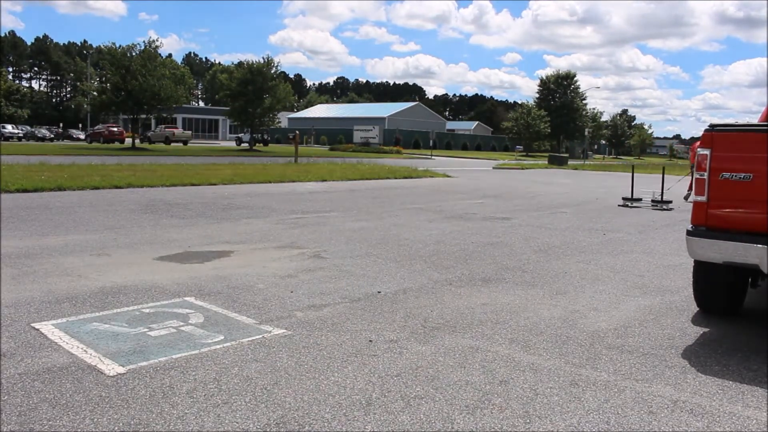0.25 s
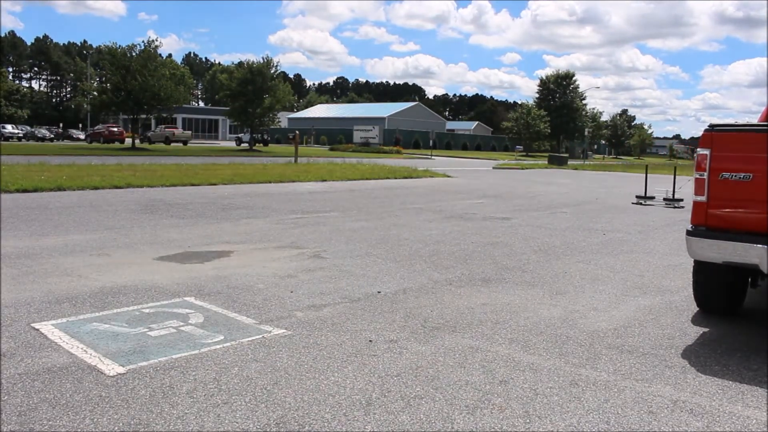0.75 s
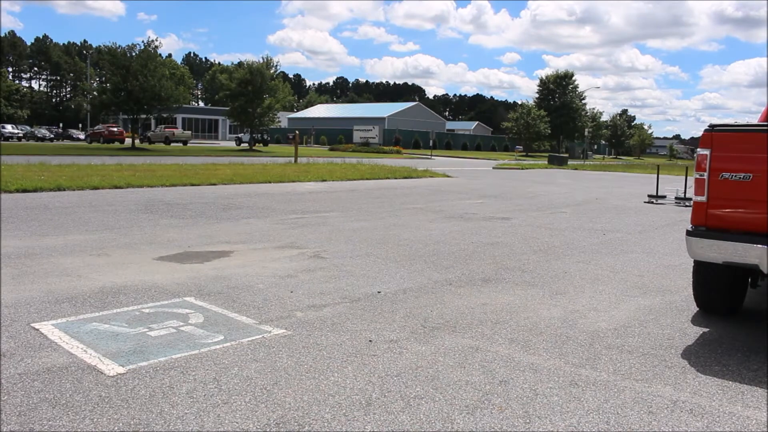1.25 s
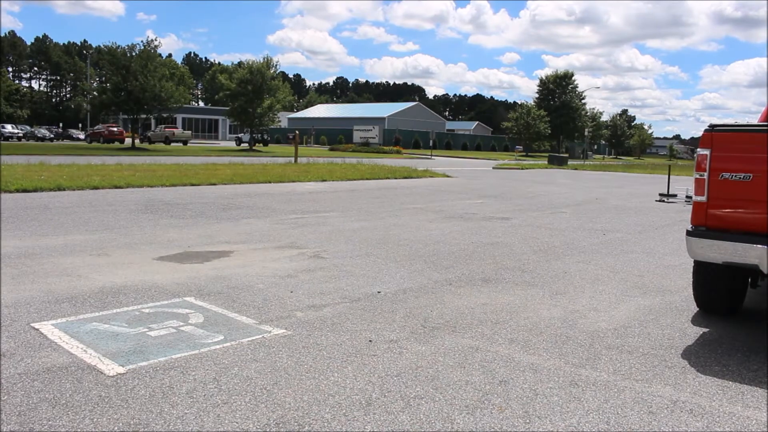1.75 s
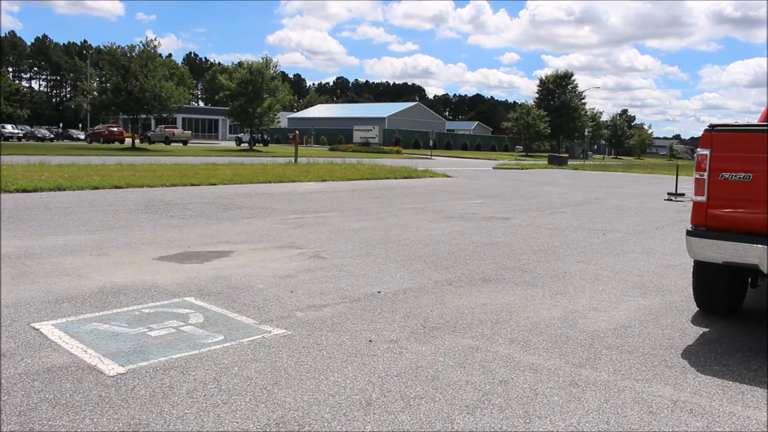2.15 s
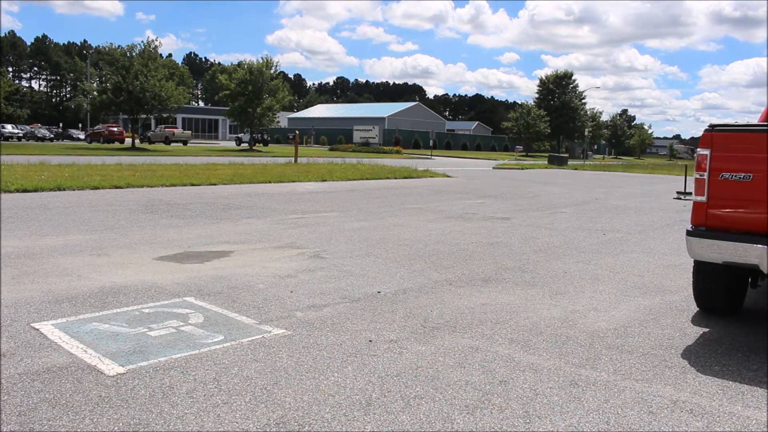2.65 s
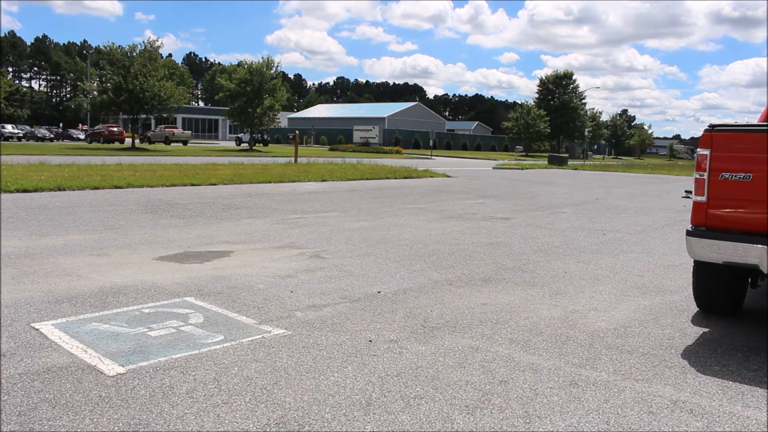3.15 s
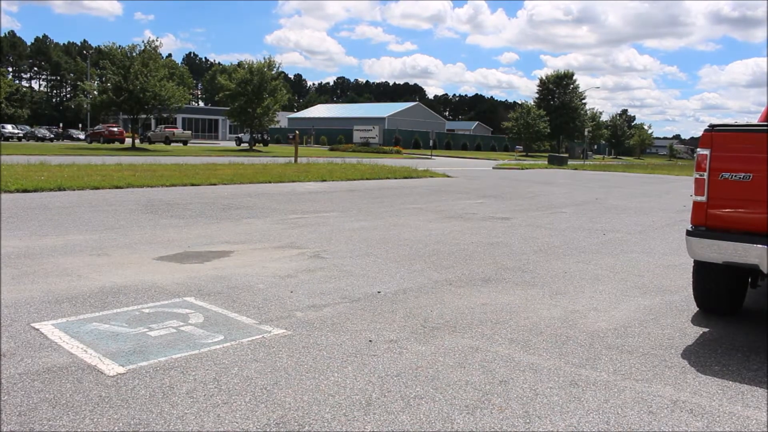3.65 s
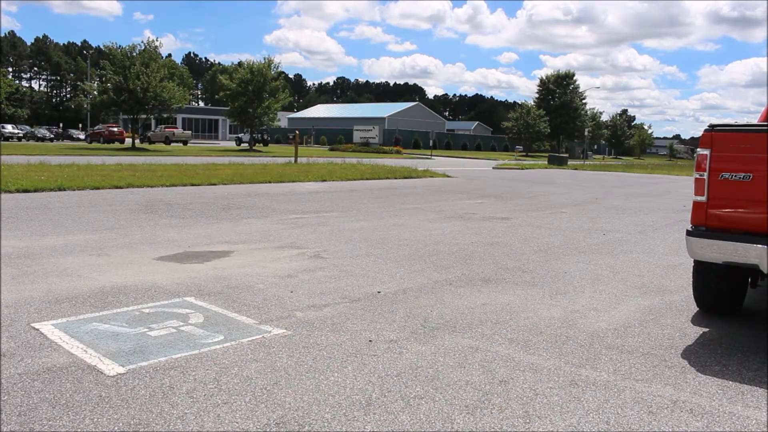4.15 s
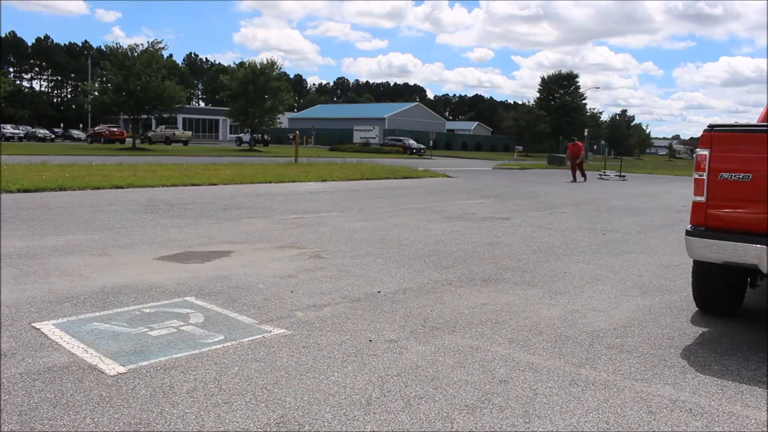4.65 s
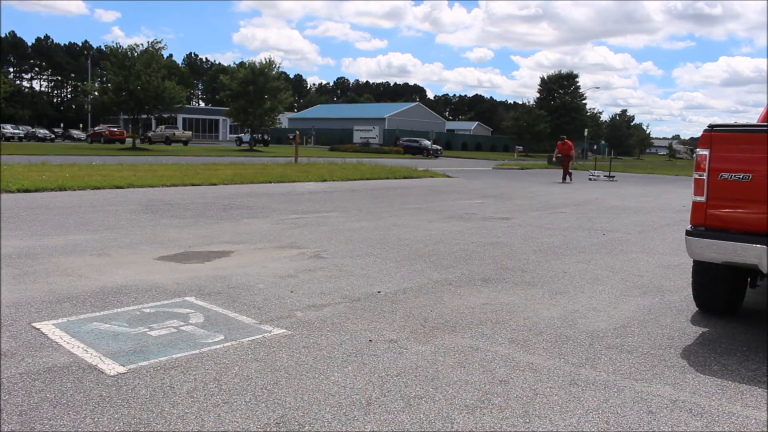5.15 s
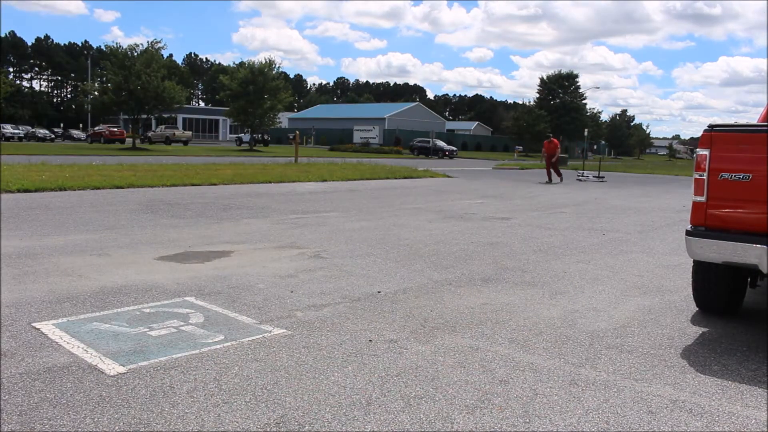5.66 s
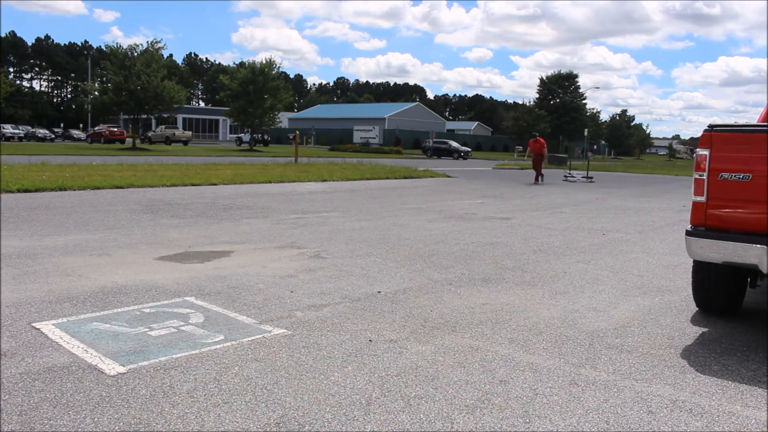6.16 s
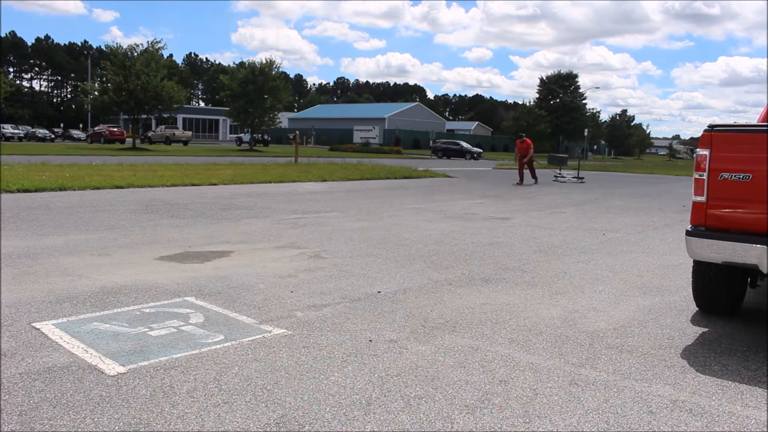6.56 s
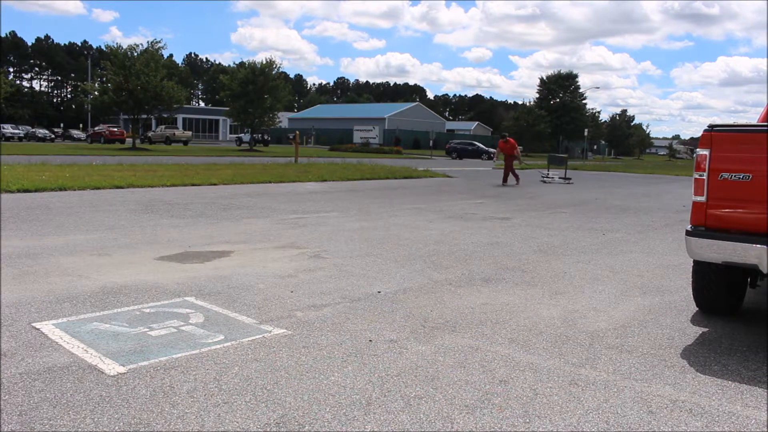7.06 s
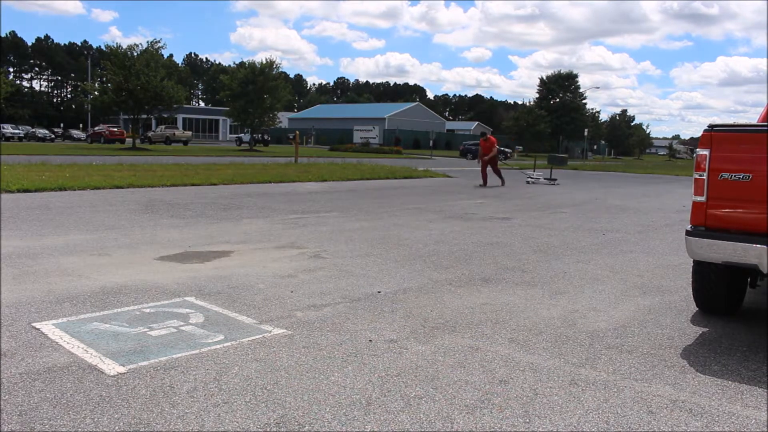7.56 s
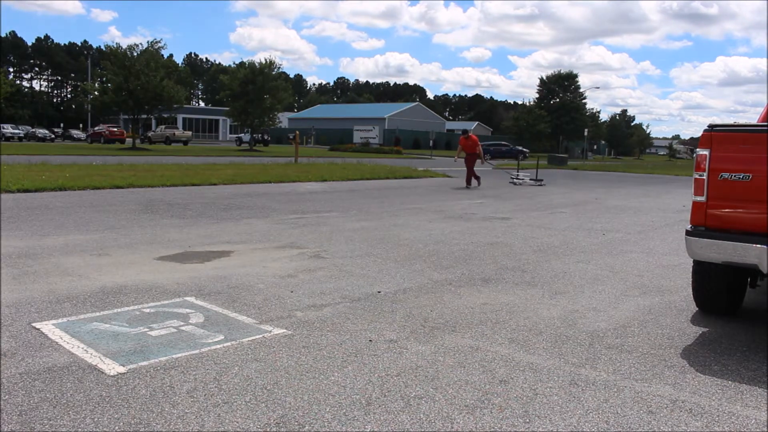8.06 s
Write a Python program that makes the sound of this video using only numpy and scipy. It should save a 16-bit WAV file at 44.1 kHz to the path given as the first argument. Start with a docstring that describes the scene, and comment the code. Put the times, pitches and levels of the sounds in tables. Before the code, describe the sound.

A weighted steel sled grinds over asphalt in bursts, plates clanking and chain clinking, while strong wind thumps the microphone early on.

```python
"""Weighted sled dragged over asphalt

A steel sled loaded with weight plates is dragged far off on a gusty day. Grit noise grinds under the runners
and shakes the resonant modes of the frame; blows make plates clank and the links of the tow chain clink.
Low noise buffets the microphone as wind, over a traffic murmur of coloured noise and a faint wavering sine hum.
A limiter holds the peaks."""
import sys
import numpy as np
from scipy import signal
from scipy.fft import rfft, irfft, next_fast_len
from scipy.io import wavfile
from scipy.ndimage import uniform_filter1d, minimum_filter1d, map_coordinates

SR = 44100
rng = np.random.default_rng(int(sys.argv[2]) if len(sys.argv) > 2 else 0)


def wav_out(sig):
    """Save sig, one row per channel (or a flat mono array), as 16-bit PCM at SR to the path in sys.argv[1]."""
    wavfile.write(sys.argv[1], SR, np.round(np.clip(np.atleast_2d(sig).T, -1, 1) * 32767).astype(np.int16))


N = 366912

# Levels in the tables are starting points: trims and random wavering are added where they are used.

# distant traffic and low scrape: start_s, level_db
TRAFFIC_LEVEL = [(0, -42), (.14, -47), (.5, -40), (.78, -44), (1.5, -37.5), (2.15, -48.5), (2.5, -38),
                 (2.85, -48), (3.0, -37.5), (3.37, -44), (3.87, -36), (4.44, -36), (5.15, -37.5),
                 (5.35, -33.5), (5.8, -37.5), (6.8, -39), (7.45, -40), (8.1, -35.5), (8.32, -36)]
# dull knocks of the runners, lifting the low murmur: peak_s, lift_db
RUNNER_KNOCKS = [(.84, 18), (1.631, 18), (2.23, 13), (2.77, 14), (3.62, 7), (4.341, 6), (5.175, 6),
                 (5.265, 6), (5.9, 8), (6.375, 9), (7.23, 8), (8.2, 6.5)]
# strength of the gusts under the thumps: start_s, level_db
GUST_LEVEL = [(0, -13), (.25, -32), (.5, -10.5), (.7, -24.5), (1.25, -23.5), (1.45, -18), (1.55, -26.5),
              (1.8, -8), (2.1, -21), (2.35, -9), (2.7, -29.5), (2.88, -30), (3.0, -14.5), (3.27, -8.5),
              (3.4, -22.5), (3.72, -21.5), (3.9, -10.5), (4.15, -18), (4.35, -29.5), (4.5, -36.5),
              (5.75, -39), (6.0, -29.5), (6.5, -27), (7.0, -35), (8.32, -49.5)]
# single eddies thumping the microphone: peak_s, peak_db
EDDY_THUMPS = [(.04, -37), (.16, -15), (0.318, -9), (.42, -11), (.55, -11), (.65, -24), (.76, -41),
               (.84, -15), (1.019, -12), (1.32, -1.5), (1.428, -2.5), (1.83, -13), (2.009, -5.5),
               (2.15, -16), (2.27, -25), (2.46, -6), (2.638, -10.5), (3.02, -14), (3.25, -15), (3.59, -13),
               (3.8, -11), (3.889, 1), (4.17, -24), (4.29, -21), (4.4, -18), (5.91, -24.5), (6.05, -24),
               (6.16, -17), (6.33, -38), (6.44, -16.5), (6.56, -19), (6.74, -26), (7.18, -34)]
# the drag under the jerks: start_s, runner_grind_db, frame_ring_over_grind_db, chain_rattle_over_grind_db
DRAG_LEVEL = [(0, -24.5, -2, -19), (.14, -38.5, 2, 5), (.19, -39, 0, -5), (.22, -31.5, -1.5, -12),
              (.9, -31.5, 4, -9.5), (1.2, -29, 0, -9.5), (1.55, -25, 0, -15), (1.8, -37, 5.5, -9),
              (2.3, -36, 1, -12.5), (2.41, -40, -1.5, -8.5), (2.55, -27.5, -1.5, -13.5),
              (2.76, -32.5, 1.5, -11), (3.05, -36.5, 3, -6), (3.2, -30, 0.5, -19), (3.29, -42, -1, -13),
              (3.65, -29, 2.5, -18), (3.9, -37, 3.5, -16), (4.36, -26.5, 0.5, -16), (4.6, -25.5, 3.5, -9.5),
              (5.0, -26, 2.5, -6.5), (5.5, -25, 2, -10), (5.95, -25.5, 6, -5.5), (6.4, -23.5, 0, -14),
              (6.8, -22, -0.5, -15), (7.3, -22, 3, -10), (7.46, -27.5, 2, -3.5), (7.65, -22, 0, -11.5),
              (8.0, -28.5, 1.5, -8.5), (8.32, -23.5, 0, -14)]
# the sled catches and jerks on, levels move up or down: peak_s, scrape_change_db, rattle_change_db
SLED_JERKS = [(.13, -3, 4.5), (.4, 3, 6), (.68, 0, 3), (.85, 5, 4.5), (0.932, 6.5, 12.5), (1.3, 1.5, 3),
              (1.2, -1, 7), (1.461, 3.5, 14), (1.53, 8, 15), (1.738, 7.5, 18.5), (1.918, 9, 15.5),
              (2.1, -3, 4), (2.78, 5, 1), (3.52, 0.5, 18), (4.451, 7, 11), (4.56, 4.5, 11), (4.629, 8, 13),
              (4.739, 5.5, 12.5), (4.87, 0.5, 0), (5.052, 1, 11), (5.178, 8.5, -6), (5.38, 3.5, 6),
              (5.508, 7, 2), (5.56, 5, 9), (5.65, 0, 16.5), (5.72, 0, 9.5), (5.88, 6, 8), (6.071, 5.5, -6),
              (6.12, 2.5, 8), (6.27, 6, 5), (6.371, 7.5, 11), (6.769, 7, 6), (6.98, -2, 4), (7.18, 2, 4),
              (7.288, 11, 9), (7.391, 9.5, 16), (7.6, 3, -10), (7.68, 1.5, 18.5), (7.718, 7.5, 14.5),
              (7.79, 5.5, 12), (7.9, 8.5, 6.5), (8.192, 7.5, 9.5), (8.26, 7, -2)]
# chain links striking: start_s, peak_db, pitch_hz
CHAIN_CLINKS = [(0.179, -15, 9700), (0.3496, -15, 10800), (1.1972, -16, 8300), (1.2516, -16.5, 8550),
                (1.5254, -19, 7700), (1.917, -14.5, 10300), (1.435, -20, 14000), (2.041, -27, 8100),
                (2.78, -15, 6460), (2.91, -21, 8700), (7.7, -3, 13000), (2.9954, -17, 11200),
                (4.4373, -13, 6000), (4.684, -8, 7000), (4.812, -21, 6840), (4.9377, -15, 9500),
                (5.005, -14, 10000), (5.046, -8.5, 8400), (5.262, -18, 9970), (5.298, -9.5, 10600),
                (5.4859, -12, 11540), (5.5548, -17, 8340), (5.6496, -20, 6870), (5.8551, -12.5, 7830),
                (6.105, -10, 9800), (6.1735, -13.5, 10600), (6.369, -16, 8010), (6.8034, -15.5, 7940),
                (6.9646, -14, 10300), (7.3357, -3.5, 8900), (7.3806, -4, 9900), (7.6446, -14, 6600),
                (7.7834, -24, 7900), (7.8725, -15, 8300), (8.086, -13, 13600), (8.221, -9, 9900)]
# plates knocking on the frame: start_s, peak_db, pitch_hz, upper_ring_relative_db, upper_pitch_hz
PLATE_CLANKS = [(0.0704, -1.5, 2500, 0.5, 4280), (0.9176, -10, 2690, 3.5, 4130),
                (1.253, -4.5, 3020, -26, 4270), (1.4576, -8, 3870, -12, 4100),
                (1.5275, -7, 3780, -12, 4040), (1.625, 0.5, 3030, -20, 4220),
                (2.5406, -6.5, 2740, -25, 4120), (2.804, 4, 3600, -3, 4800), (2.8569, 0, 3850, -25, 4240),
                (2.7673, -9, 1400, -20, 4100), (2.9, -12, 4800, 1, 3870), (3.948, -13.5, 3240, -23, 4100),
                (5.1764, -9, 3340, -9, 4300), (4.11, -14, 3540, 0, 4100), (4.1866, -3.5, 1350, -17, 4340),
                (4.481, -1, 3170, -28, 4100), (4.551, -1.5, 1470, -13, 4070), (5.005, 3, 3030, 0, 5270),
                (5.516, -2, 3380, -24, 4020), (5.7154, -0.5, 3500, -4, 4300), (5.9968, -7, 3250, -12, 4040),
                (6.1825, -3.5, 3670, -15, 4150), (6.2667, 2, 1330, -29, 4260), (6.8047, 3, 2890, -9, 4000),
                (7.4138, 1.5, 3060, -26, 4010), (7.666, -1.5, 3370, -14, 4050),
                (8.191, -2, 3180, -22, 4080)]
# chain link modes: pitch_hz, width_hz, level_db
LINK_MODES = [(5565, 35, -1), (5765, 35, 1), (6000, 35, 0), (6520, 40, 2), (6850, 45, 2), (7200, 40, -5),
              (7800, 50, -7), (8010, 32, -4), (8300, 40, -5), (8550, 50, -6), (9160, 35, -6),
              (9840, 50, -6), (10050, 40, -5), (10700, 36, -7), (11400, 40, -8), (12100, 40, -9),
              (12700, 50, -9), (13600, 60, -10), (14200, 50, -10), (14800, 40, -12)]
# frame and plate modes: pitch_hz, width_hz, level_db
FRAME_MODES = [(1290, 50, -6), (1410, 50, -7), (1515, 60, -3), (1690, 60, -7), (1930, 30, -9),
               (2100, 35, -14), (2390, 45, -15), (2520, 35, -11), (2720, 60, -4), (2960, 50, -12),
               (3160, 40, -4), (3290, 60, 0), (3440, 40, -9), (3670, 25, -9), (3760, 40, -5),
               (3850, 40, -9), (4020, 50, -10), (4200, 50, -9), (4350, 50, -15), (4610, 30, -17),
               (4760, 35, -19), (4890, 40, -16), (5110, 50, -15)]
# noise colour of the far traffic and low scrape: pitch_hz, relative_level_db
ROAD_COLOUR = [(35, -32), (60, 3.5), (97, -1), (124, 2), (167, -4.5), (207, -1), (261, -7), (372, -4.5),
               (1000, -11), (1300, -2.5), (2200, -120)]
# noise colour of the wind buffeting: pitch_hz, relative_level_db
BUFFET_COLOUR = [(7.1, -34), (12, -1), (43, 4), (80, -6), (100, -13), (180, -120)]
# noise colour of the faster wind flutter: pitch_hz, relative_level_db
FLUTTER_COLOUR = [(41, -47), (70, -3), (121, -10), (214, -25.5), (247, -27.5), (320, -37), (420, -44),
                  (700, -120)]
# noise colour of the chain hiss: pitch_hz, relative_level_db
HISS_COLOUR = [(3060, -37), (5200, 1.5), (6760, 6.5), (8780, 0), (10300, 2), (12200, -3.5), (14500, -5.5),
               (15600, -7.5)]
# noise colour of the grinding runners: pitch_hz, relative_level_db
RUNNER_COLOUR = [(500, -77), (850, -12), (1020, -7), (1110, -4.5), (1460, 3.5), (1770, 1), (2060, -6.5),
                 (2400, -5), (3120, -58), (5280, -120)]
# noise colour of the sled body: pitch_hz, relative_level_db
BODY_COLOUR = [(1350, -69), (2300, -67), (2710, 2.5), (2930, -7), (3280, 1.5), (4100, -0.5), (4580, -14.5),
               (5400, -15), (7020, -17.5), (11900, -120)]

TOP_HZ = 15780  # upper band limit of the whole mix
STEP = 64  # samples between control values
# a far machine hums in the second half of the scene
HUM_START_S, HUM_END_S, HUM_EDGE_S = 4.4, 7.35, .1
HUM_HZ, HUM_DB, HUM_FADE_DB = 206, -41, -5  # centre pitch, first rms level, change by the end
THUMP_S = 0.017  # both rise and fall time of a thump
# flutter follows the gusts by a share of their dB, the thumps weakly
FLUTTER_DB, FLUTTER_GUST, FLUTTER_THUMP_DB = -11, 0.77, -16.5
WIND_TOP = .85  # amplitude ceiling: the capsule cannot follow the strongest eddies
KNOCK_RISE_S, KNOCK_FALL_S = 0.0074, 0.02
JERK_RISE_S, JERK_FALL_S = 0.01, 0.017
FRAME_JERK = 1.03  # the frame level moves more than the runners
CLINK_LOW_DB, CLINK_LOW_HZ = -17.5, 6000  # every clink also rings the larger links


def amp(db):
    """Decibels to gain."""
    return 10 ** (np.asarray(db) / 20)


def unit(x):
    """Scaled to rms 1."""
    return x / np.sqrt(np.mean(x ** 2) + 1e-20)


def curves(rows):
    """One value per sample for each column after the time."""
    s, *columns = np.transpose(rows)
    t = np.arange(N) / SR
    return [np.interp(t, s, column) for column in columns]


def wobble(rate):
    """Random knots, rate a second, joined by straight lines."""
    knots = rng.standard_normal(int(N * rate / SR) + 4)
    return map_coordinates(knots, [np.arange(N) * rate / SR], order=1)


def filtered(x, response):
    """x times a response of frequency."""
    m = next_fast_len(N + 8192)
    spectrum = rfft(x, m) * response(np.fft.rfftfreq(m, 1 / SR))
    return irfft(spectrum, m)[..., :N]


def coloured(x, points):
    """x with the (Hz, dB) colour drawn on a log frequency axis, rms 1."""
    f, db = np.transpose(points)
    return unit(filtered(x, lambda hz: amp(np.interp(np.log(hz + 1), np.log(f + 1), db))))


def resonate(x, hz, width_hz):
    """A two-pole resonance; an impulse rings at about its own height."""
    r = np.exp(-np.pi * width_hz / SR)
    w = 2 * np.pi * hz / SR
    return np.sin(w) * signal.lfilter([1], [1, -2 * r * np.cos(w), r * r], x)


def dying(x, seconds):
    """Every value leaves an exponential trail along the last axis, one value per STEP samples."""
    return signal.lfilter([1], [1, -np.exp(-STEP / (seconds * SR))], x)


def moves(times, sizes, rise, fall):
    """Each event moves the curve quickly by its size, up or down, and it returns; overlaps add."""
    grid = np.arange(0, N, STEP)
    t = grid[:, None] / SR - np.asarray(times)
    shape = np.where(t < 0, np.exp(-(t / rise) ** 2), np.exp(-np.abs(t / fall)))
    return np.interp(np.arange(N), grid, shape @ np.asarray(sizes))


def jolts(rate, fade):
    """The sled skips over bumps: sudden rises of shaking that die away."""
    steps = N // STEP + 3
    return dying((rng.random(steps) < rate * STEP / SR) * rng.random(steps), fade)


def grit(bumps, bump_db, spiky_db, rate, spread, fade, lumpy_db):
    """Dense stone contacts of unequal size; bumps lift all bands, small scrapes flare up each in its own band."""
    contacts = rng.standard_normal(N) * amp(spiky_db * rng.exponential(size=N))
    bands = signal.stft(contacts, nperseg=2 * STEP)[2]
    flares = (rng.random(bands.shape) < rate * STEP / SR) * rng.random(bands.shape)
    flares = abs(dying(uniform_filter1d(flares, spread, 0), fade))  # spread counts frequency bins
    # roots bound pile-ups
    lift = lumpy_db * np.sqrt(unit(flares)) + bump_db * np.sqrt(unit(bumps[:bands.shape[1]]))
    return unit(signal.istft(bands * amp(lift), nperseg=2 * STEP)[1][:N])


def ring(modes, drive, own_db, hits, reach, hit_db, scatter, free):
    """Each mode is shaken by the drive at its own wavering strength and struck by the hits near its pitch."""
    out = np.zeros(N)
    s, peak_db, main_hz, second_db, second_hz = np.transpose(hits)
    luck = rng.random((len(s), len(modes), 2))
    top_db = max(mode[2] for mode in modes)
    for (hz, width_hz, db), (weakness, delay) in zip(modes, luck.transpose(1, 2, 0)):
        # blows fade with the squared distance in octaves from their two pitches
        near = amp(-reach * np.log2(hz / main_hz) ** 2)
        near += amp(second_db - reach * np.log2(hz / second_hz) ** 2)
        at = ((s + scatter * delay) * SR).astype(int)  # each mode starts at its own random delay
        blow_db = peak_db + hit_db + (db - top_db) / 2 - 10 * weakness
        blows = np.bincount(at, near * amp(blow_db), N)
        soft = resonate(blows, hz, 600) * np.pi * 600 / SR  # a blow lasts about a millisecond

        signs = rng.choice([-1, 1], N)  # random signs, sample by sample, keep the modes independent
        own_gain = amp(db - top_db + own_db * wobble(15))
        shake = drive * signs * own_gain * np.sqrt(2 * np.pi * width_hz / SR)
        out += resonate(shake, hz, width_hz)
        out += resonate(soft, hz, free * width_hz)  # free below 1 rings longer, above 1 shorter
    return out


def cracks(hits, colour, t60, level_db):
    """A short burst of broad noise at each blow, falling 60 dB in t60 seconds."""
    s, peak_db = np.transpose(hits)[:2]
    starts = np.bincount((s * SR).astype(int), amp(peak_db + level_db), N)
    fade = signal.lfilter([1], [1, -amp(-60 / (t60 * SR))], starts)
    return fade * coloured(rng.standard_normal(N), colour)


def drag_levels():
    """dB of grind, frame ring and chain rattle: the underlying drag plus the jerks."""
    grind_db, frame_db, rattle_db = curves(DRAG_LEVEL)
    s, scrape_change_db, rattle_change_db = np.transpose(SLED_JERKS)
    jerk_db = moves(s, scrape_change_db, JERK_RISE_S, JERK_FALL_S)
    shake_db = moves(s, rattle_change_db, JERK_RISE_S, JERK_FALL_S)
    return grind_db + jerk_db, grind_db + frame_db + FRAME_JERK * jerk_db, grind_db + rattle_db + shake_db


def traffic(bumps):
    """Traffic murmurs far off with the low edge of the scrape: lumpy coloured noise, lifted by runner knocks."""
    murmur = grit(bumps, bump_db=3, spiky_db=0, rate=8, spread=1, fade=.03, lumpy_db=3.5)
    level_db = curves(TRAFFIC_LEVEL)[0] + 3.5 + 2.74 * wobble(13)
    knock_db = moves(*np.transpose(RUNNER_KNOCKS), KNOCK_RISE_S, KNOCK_FALL_S)
    return amp(level_db + knock_db) * coloured(murmur, ROAD_COLOUR)


def hum():
    """A far machine's hum: one sine wavering in pitch and level."""
    level_db, = curves([(HUM_START_S - HUM_EDGE_S, -90), (HUM_START_S, HUM_DB),
                        (HUM_END_S, HUM_DB + HUM_FADE_DB), (HUM_END_S + HUM_EDGE_S, -90)])
    gain = np.sqrt(2) * amp(level_db + 4.3 * wobble(16))  # sine peak from rms
    return gain * np.sin(2 * np.pi * np.cumsum(HUM_HZ + 7 * wobble(25)) / SR)


def wind():
    """Gusts and eddies buffet the microphone, a faster flutter rides on them; a little stronger on the left."""
    gust_db, = curves(GUST_LEVEL)
    s, peak_db = np.transpose(EDDY_THUMPS)
    thumps = moves(s, amp(peak_db), THUMP_S, THUMP_S)
    lumps = wobble(16)
    buffet = unit(amp(2.0 * lumps) * coloured(rng.standard_normal(N), BUFFET_COLOUR))
    flutter = unit(amp(4.1 * lumps) * coloured(rng.standard_normal(N), FLUTTER_COLOUR))
    flutter *= amp(FLUTTER_DB + FLUTTER_GUST * gust_db) + amp(FLUTTER_THUMP_DB) * thumps
    push = (amp(gust_db) + thumps) * buffet + flutter
    bounded = push / (1 + (push / WIND_TOP) ** 4) ** (1 / 4)
    return bounded * amp([[.2], [-.2]])


def chain(bumps):
    """The tow chain hisses over the ground as noise and its links clink as struck modes."""
    rattle = amp(drag_levels()[2])
    clinks = [(*row, CLINK_LOW_DB, CLINK_LOW_HZ) for row in CHAIN_CLINKS]
    drag = grit(bumps, bump_db=5.5, spiky_db=1.5, rate=2.5, spread=13, fade=.022, lumpy_db=7)
    hiss = rattle * amp(-5.5) * coloured(drag, HISS_COLOUR)
    links = ring(LINK_MODES, rattle * amp(-12) * drag, own_db=6, hits=clinks, reach=80, hit_db=-3,
                 scatter=.015, free=1.6)
    return hiss + links + cracks(CHAIN_CLINKS, HISS_COLOUR, t60=.05, level_db=-22)


def sled(bumps):
    """Runners grind on grit, which makes the frame sing at its modes; plates clank on it."""
    grind_db, frame_db, _ = drag_levels()
    stones = grit(bumps, bump_db=3, spiky_db=2, rate=9, spread=3, fade=.012, lumpy_db=4.5)
    grind = amp(grind_db - 4) * coloured(stones, RUNNER_COLOUR)
    grind += amp(frame_db - 4.5) * coloured(stones, BODY_COLOUR)
    # low modes follow the runners, high modes the frame level
    low = [mode for mode in FRAME_MODES if mode[0] < 2200]
    high = FRAME_MODES[len(low):]
    song = ring(low, amp(grind_db - 8) * stones, own_db=5.5, hits=PLATE_CLANKS, reach=12, hit_db=-9,
                scatter=.004, free=.7)
    song += ring(high, amp(frame_db - 7) * stones, own_db=5.5, hits=PLATE_CLANKS, reach=200, hit_db=-3,
                 scatter=.004, free=.42)
    return grind + song + cracks(PLATE_CLANKS, BODY_COLOUR, t60=.06, level_db=-20)


def scene():
    """Everything but the wind reaches both channels alike; the same bumps shake sled, chain and murmur."""
    bumps = jolts(rate=25, fade=.018)
    return traffic(bumps) + hum() + wind() + chain(bumps) + sled(bumps)


def record(dry):
    """A quick limiter turns the peaks down in both channels together, then the band limit."""
    need = np.minimum(1, .99 / (np.abs(dry).max(axis=0) + 1e-9))
    gain = uniform_filter1d(minimum_filter1d(need, size=601), size=301)
    return filtered(dry * gain, lambda hz: hz < TOP_HZ)


dry = scene()
out = record(dry)
wav_out(out)
```